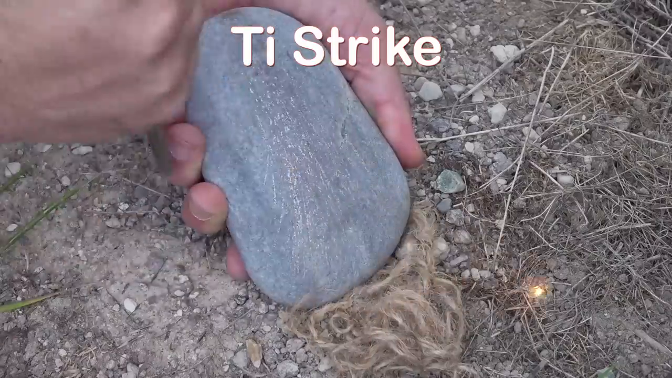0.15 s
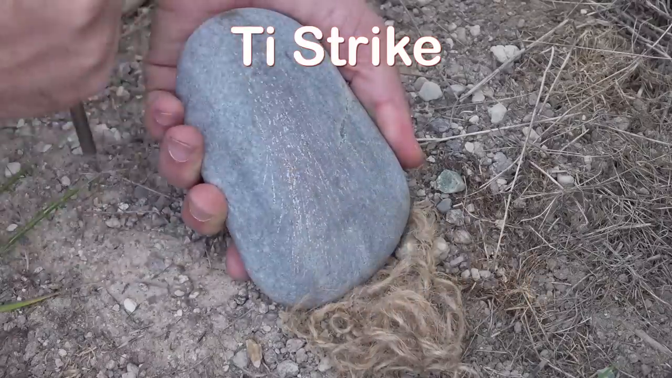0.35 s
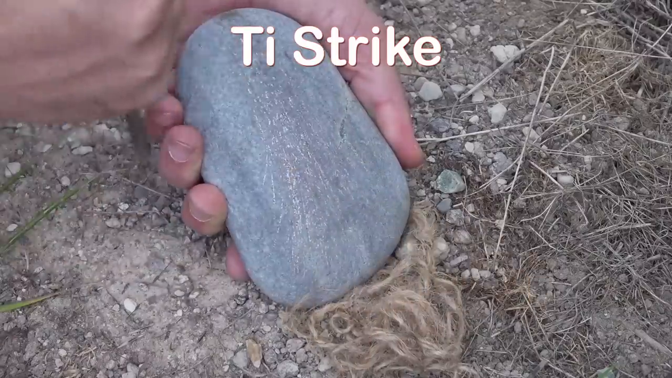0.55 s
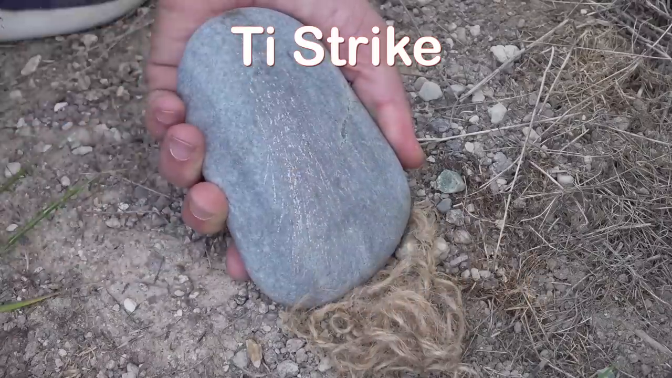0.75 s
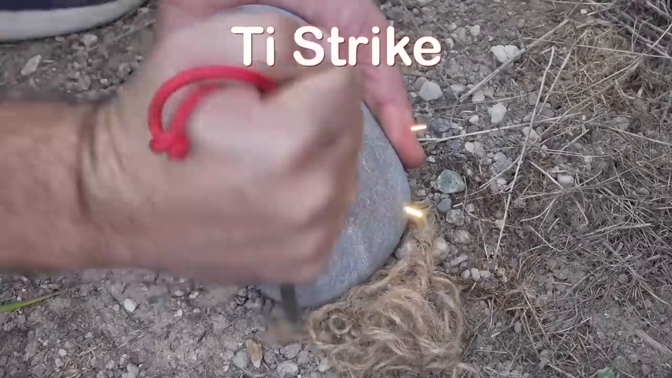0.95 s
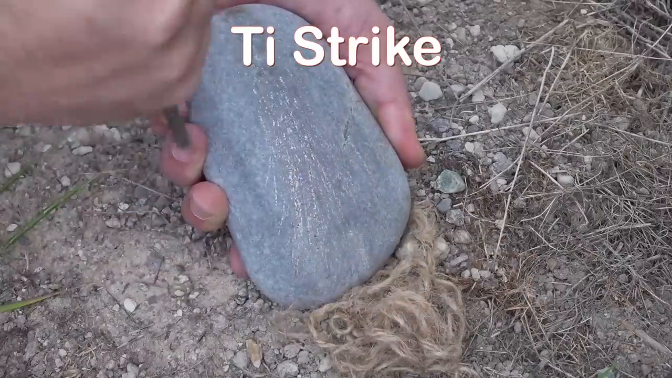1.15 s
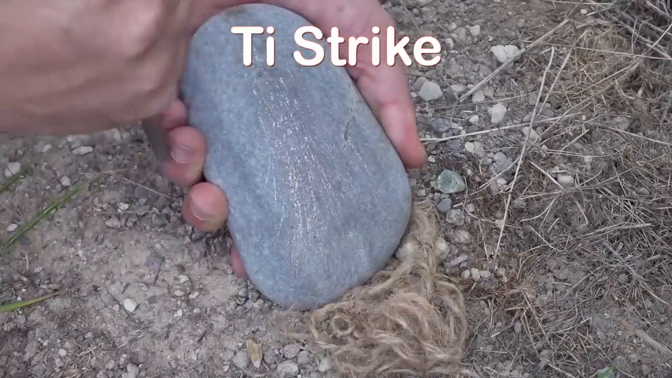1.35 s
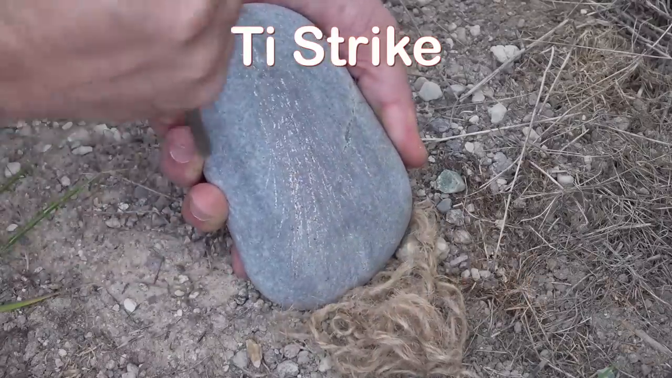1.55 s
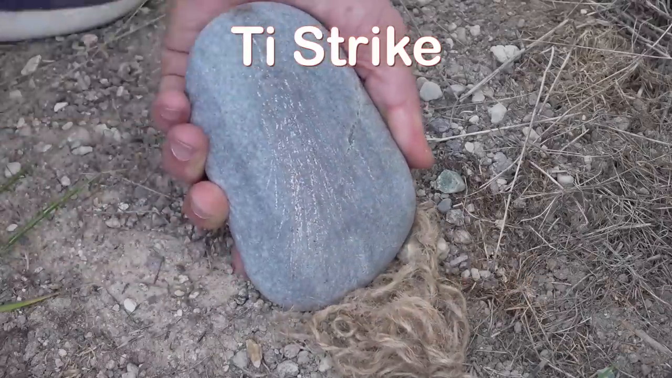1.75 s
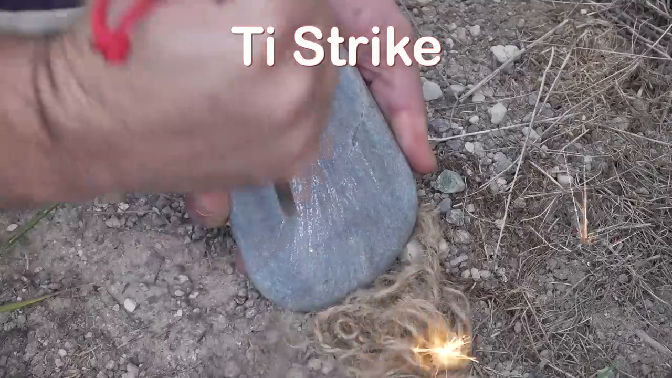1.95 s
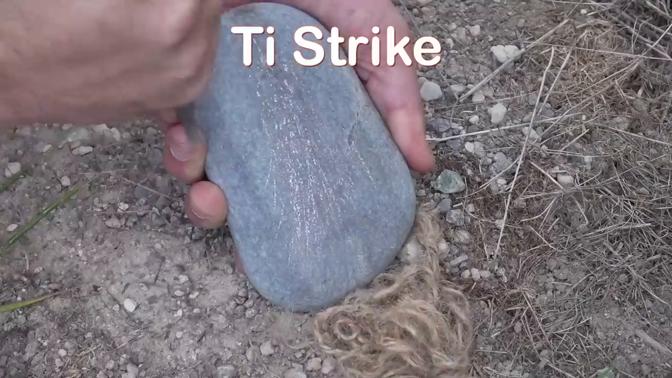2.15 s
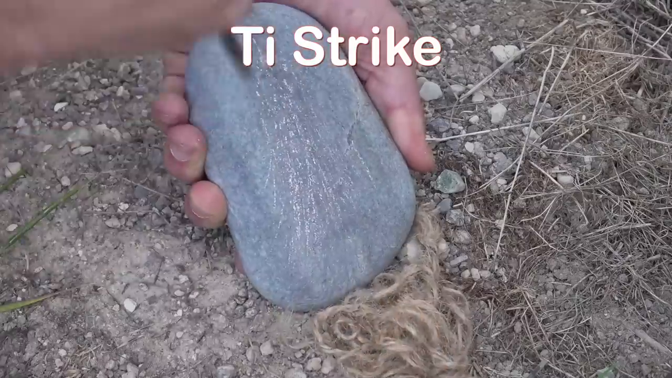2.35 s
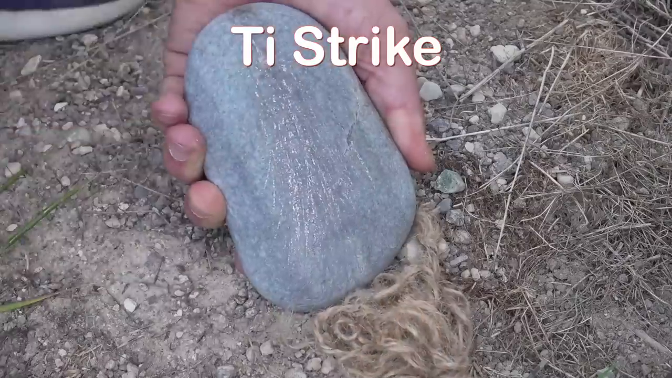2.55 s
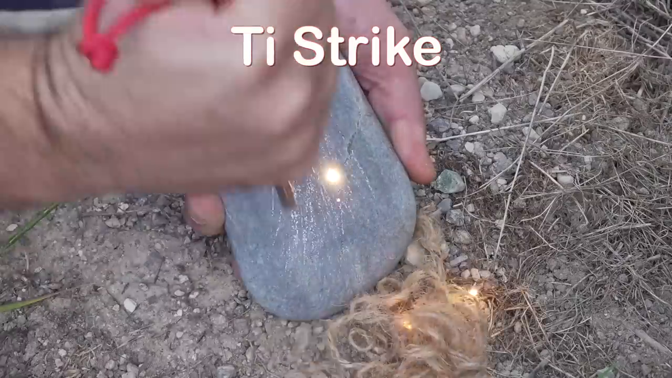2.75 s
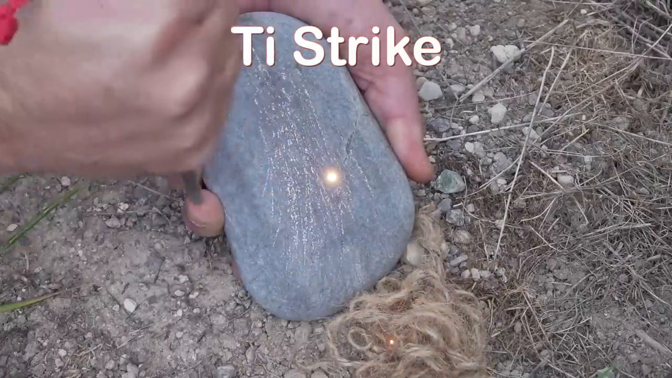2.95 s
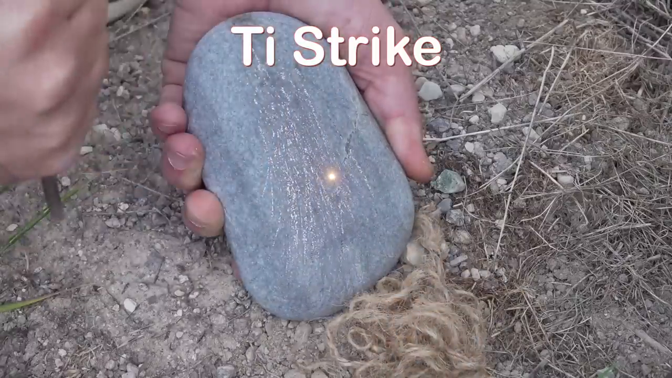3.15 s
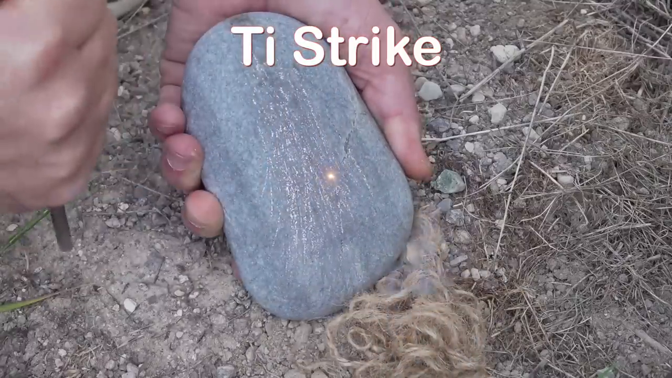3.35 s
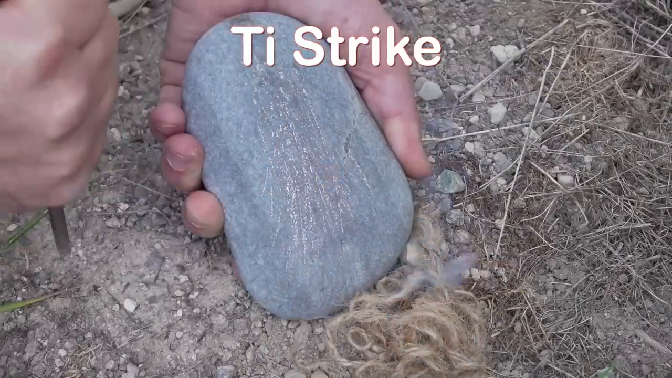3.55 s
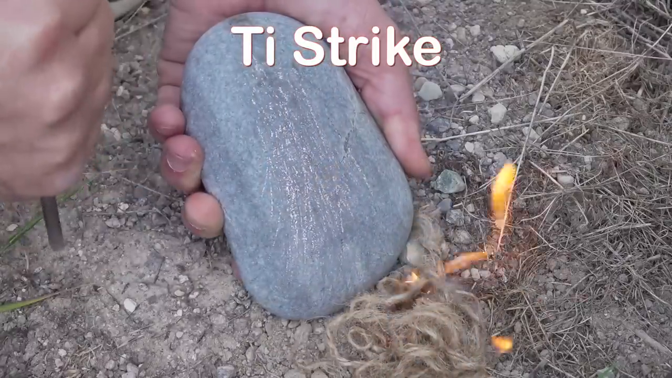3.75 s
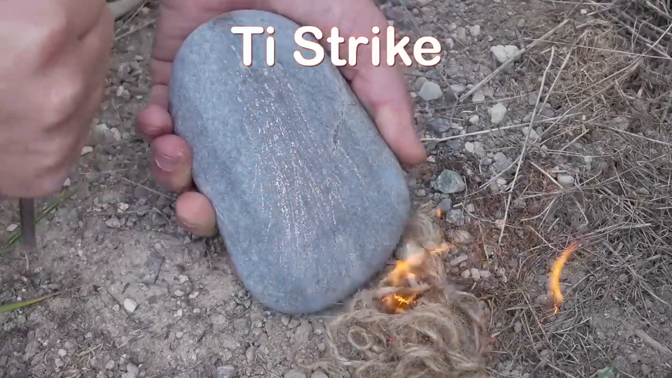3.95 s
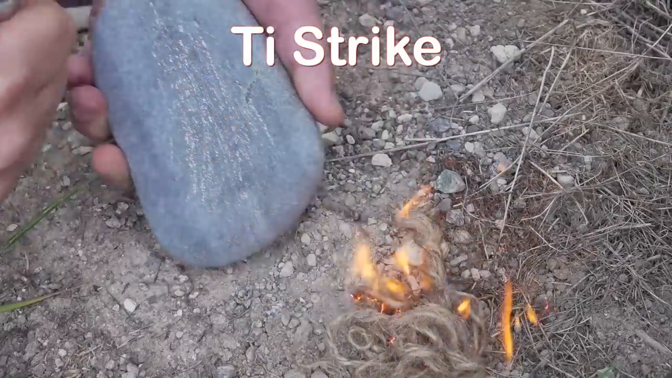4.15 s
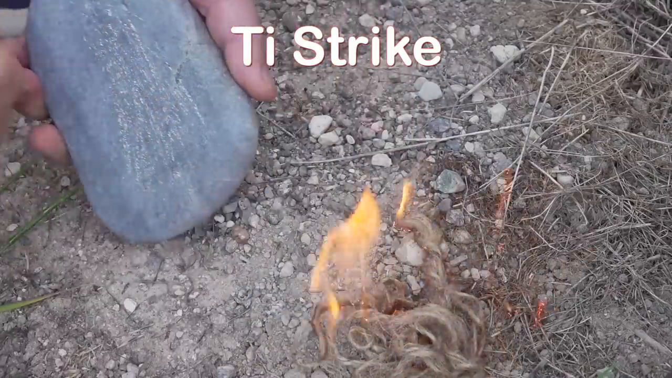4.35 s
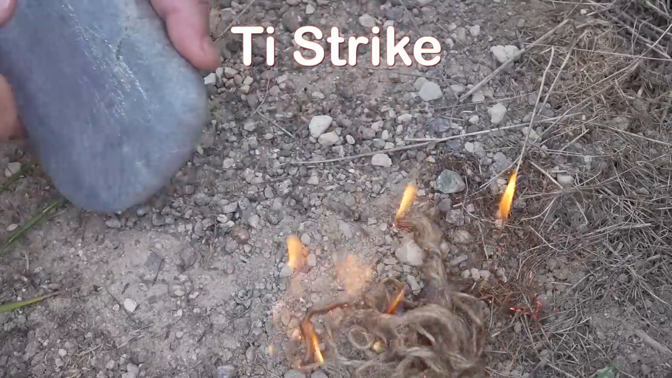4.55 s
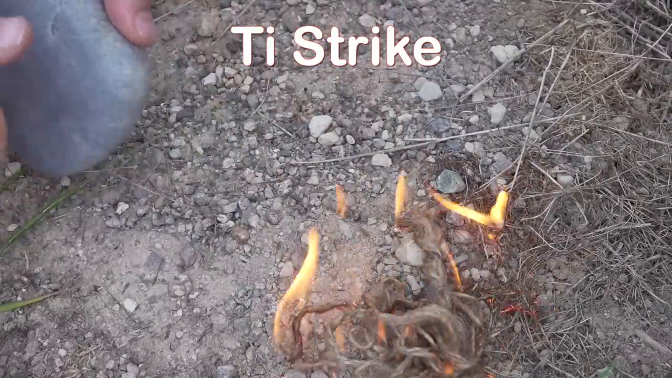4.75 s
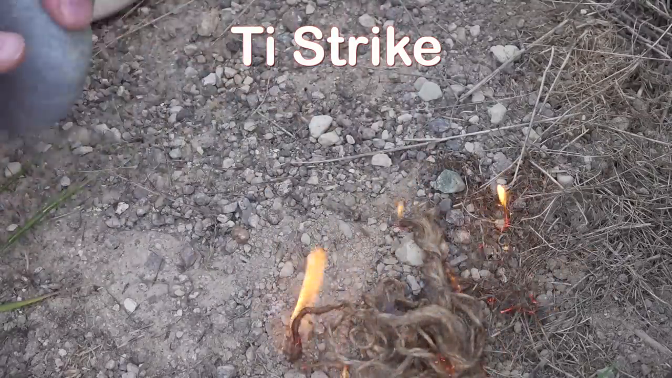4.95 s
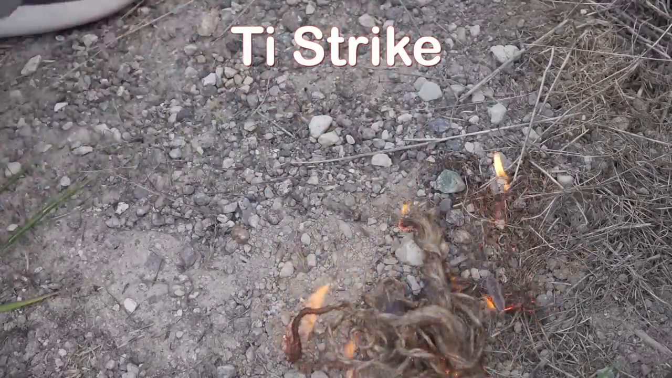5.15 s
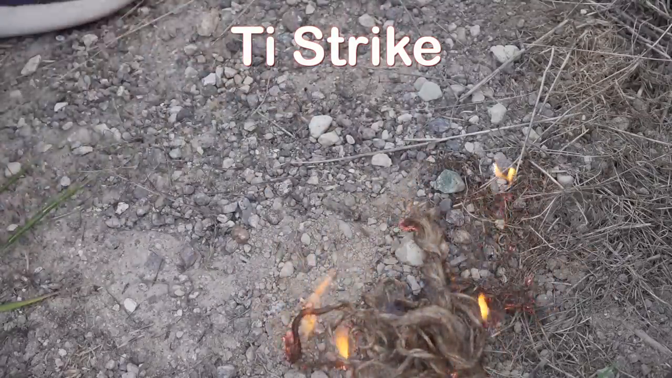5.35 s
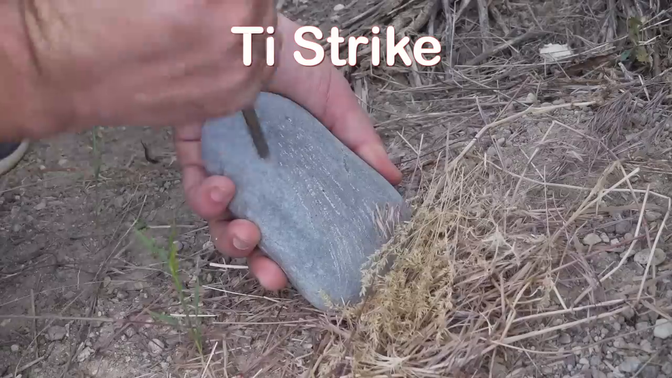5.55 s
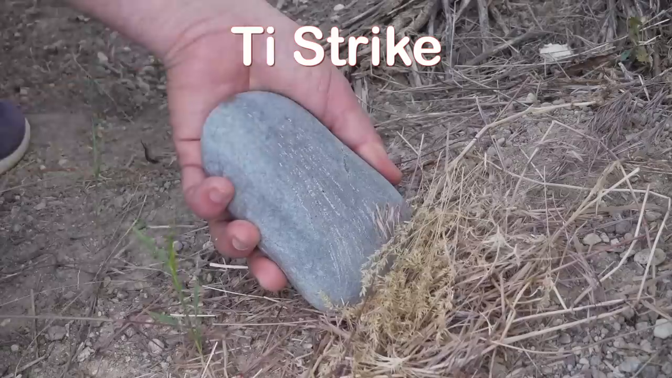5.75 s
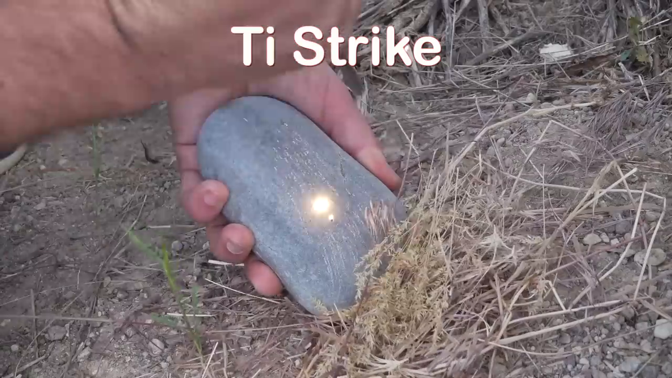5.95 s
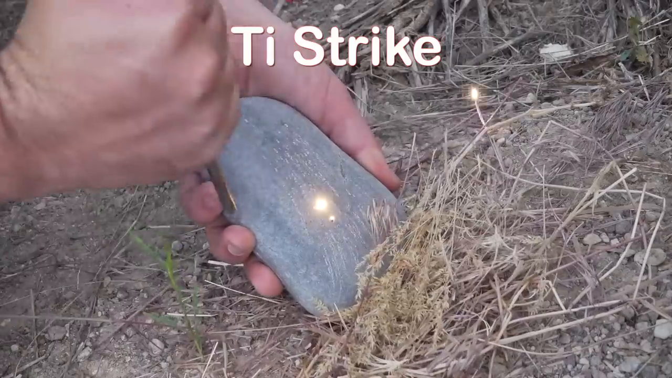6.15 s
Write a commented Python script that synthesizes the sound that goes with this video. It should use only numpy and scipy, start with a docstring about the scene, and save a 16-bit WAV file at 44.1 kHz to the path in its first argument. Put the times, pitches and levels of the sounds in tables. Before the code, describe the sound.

A metal rod strikes and scrapes a stone four times outdoors, with sparks popping and fizzing and tinder faintly catching fire.

```python
"""Four sharp clacks, each with a short gritty scrape: a titanium rod struck down a hand-held stone,
close by, outdoors. The sparks fizz as they burn and pop as they burst. Dry tinder catches, hisses
and dies away. Wind nudges the microphone, birds whistle far off, and near the end a distant engine
comes in with a low drone that fades and slows."""
import sys
import numpy as np
from scipy import signal
from scipy.io import wavfile

SR = 44100
rng = np.random.default_rng(int(sys.argv[2]) if len(sys.argv) > 2 else 0)


def put_to_file(sound):
    """Save the sound as 16-bit audio at rate SR, in the file named by the first command-line argument."""
    columns = np.atleast_2d(sound).T  # one column per channel
    safe = np.clip(columns, -1, 1)
    whole_steps = np.round(safe * 32767)
    wavfile.write(sys.argv[1], SR, whole_steps.astype(np.int16))


N = 273217
TIME = np.arange(N) / SR

# modes of the first blow and of the sliding rod: f/Hz, width/Hz, level/dB
BLOW_MODES = [(1170, 140, -11), (4800, 180, -2.5), (5230, 160, 4), (5860, 220, 0.5), (8120, 190, -9),
              (8484, 220, -4.5), (9300, 260, -9)]
ROD_MODES = [(2870, 140, -18), (5070, 110, 0.5), (5260, 89, -3), (5500, 100, -8.5), (5970, 110, -3.5),
             (6700, 90, -7), (7480, 110, -6.5), (8400, 90, -8), (10910, 90, -10), (12500, 90, -14.5)]
# palm-damped stone: f/Hz, width/Hz, level/dB, peak after contact/s
STONE_MODES = [(1217, 96, -3, 0.0046), (1618, 130, -2.5, .021), (3150, 270, -7.5, .022)]
# spectra of landing chatter and breaking grit: f/Hz, level/dB
CHATTER_SPECTRUM = [(200, -34), (750, -32.5), (1150, -5.5), (1900, -15), (3400, -20.5), (4300, -11.5),
                    (5100, 2), (6100, -6.5), (7000, -11.5), (8300, -4), (10500, -14), (13000, -16),
                    (16000, -40.5)]
GRIT_SPECTRUM = [(150, -22.5), (520, -23.5), (2100, -8.5), (2550, -14.5), (3700, -12.5), (4500, -3.5),
                 (5300, -3), (6200, -0.5), (7000, -6.5), (8500, -8), (11000, -10), (13000, -14.5),
                 (16000, -23.5)]


def strike(clack_db, scrape_db, peak_s, fade_db_per_s, stone_db, squeal_hz, squeal_db, tilt_db):
    """The rod lands, chatters, bites harder as it slides, and lifts off in a spray of sparks."""
    t = np.arange(SR // 6) / SR
    landing = np.minimum(t / .00039, 1) * np.exp(-np.maximum(t - .001, 0) / .0022)
    rung = ring(signal.unit_impulse(len(t), round(.0003 * SR)), BLOW_MODES)
    # small bodies radiate little bass
    radiation = [(200, -31), (600, -14.5), (1100, .5), (2800, -10), (4700, -2.5), (9000, .5),
                 (14000, -5.5)]
    blow = at_level(colour(rung, radiation), landing, clack_db - 3.5)
    bounces = grit(landing, spread_db=-1.5, per_s=23000)
    chatter = at_level(colour(bounces, CHATTER_SPECTRUM), landing, clack_db - 2)

    pressure_db = -420 * np.maximum(peak_s - .005 - t, 0)
    pressure_db -= fade_db_per_s * np.maximum(t - peak_s - .002, 0)
    skip_db = 1.4 * wander(450)[:len(t)]  # rod skips over the grain
    slide = amp(pressure_db + skip_db) * np.minimum(t / .0022, 1)
    fractures = grit(slide, spread_db=4, per_s=5700)
    scrape = at_level(colour(fractures, GRIT_SPECTRUM, tilt_db), slide, scrape_db - 2.5)
    rod = at_level(ring(grit(slide ** .91, spread_db=2), ROD_MODES), slide, scrape_db - 6.5)
    bite = grit(slide ** 2)  # hard pressure only
    squeal = at_level(ring(bite, [(squeal_hz, 120, 0)]), slide, squeal_db)
    stone = np.zeros(len(t))
    for hz, width_hz, db, wake_s in STONE_MODES:  # moving contact wakes the modes in turn
        drive = np.exp(-((t - wake_s) / .011) ** 2)
        stone += at_level(ring(grit(drive, spread_db=1.5), [(hz, width_hz, 0)]), drive, stone_db + db)

    push = np.exp(-((t - .033) / .02) ** 2)  # hand takes up the blow
    hand_spectrum = [(60, -13), (230, -1), (480, -11.5), (800, -3), (2500, -10.5), (8000, -45)]
    thud = at_level(colour(grit(push), hand_spectrum), push, scrape_db - 23)
    flight = np.exp(-np.abs(t - .045) / .011)
    particles = grit(flight, spread_db=4, per_s=1300)
    spray = at_level(colour(particles, GRIT_SPECTRUM, tilt_db=1.1), flight, -47)
    return blow + chatter + scrape + rod + squeal + stone + thud + spray


# rod strokes: t/s, clack ref/dB, scrape ref/dB, pressure peak/s, fade/(dB/s), stone ref/dB,
# squeal/Hz, squeal/dB, grit tilt/(dB/octave)
STROKES = [(0.9462, -8.5, -19.5, 0.021, 1147.5, -32.5, 5330, -25.5, 7.5),
           (1.8853, -5.5, -17, 0.019, 1001, -29.5, 5555, -22.5, 0.5),
           (2.6618, -8, -19, 0.023, 1394, -28, 7520, -28, 1.5),
           (5.8897, -10.5, -28, 0.0214, 1200, -27.5, 5090, -37, -5)]


def strokes():
    """Four blows of rod on stone, amid the handling noise."""
    out = handling()
    for start_s, *stroke in STROKES:
        add(out, start_s, strike(*stroke))
    return out


# light rod contacts: t/s, grit/dB, stone/dB, decay/s
ROD_GRAZES = [(0.9915, -32, -44, 0.0013), (1.218, -35, -32, 0.0018), (2.0974, -42.5, -66, 0.0027),
              (2.244, -56.5, -51, .004), (2.7625, -51, -55.5, 0.029), (2.8247, -45.5, -60, .003),
              (5.609, -46.5, -67, 0.0025)]
# shifting grip: t/s, level/dB, f/Hz, decay/s
GRIP_KNOCKS = [(2.763, -44.5, 740, .04), (3.6572, -37.5, 1010, 0.018), (3.548, -50.5, 370, 0.013),
               (3.731, -50.5, 660, 0.017), (3.983, -47.5, 320, 0.018), (4.2525, -40.5, 378, 0.011),
               (5.132, -44, 1900, 0.0029)]


def handling():
    """The rod grazes the stone; the grip shifts with knocks dulled by flesh."""
    out, t = np.zeros(N), np.arange(SR // 6) / SR
    modes = [mode[:3] for mode in STONE_MODES]
    for start_s, grit_db, stone_db, decay_s in ROD_GRAZES:
        force = np.exp(-t / decay_s)
        scratch = at_level(colour(grit(force), GRIT_SPECTRUM), force, grit_db)
        stone = at_level(ring(grit(force), modes), force, stone_db)
        add(out, start_s, scratch + stone)
    for start_s, db, hz, decay_s in GRIP_KNOCKS:
        force = np.exp(-t / decay_s)
        flesh_spectrum = [(hz / 4, -6), (hz, 0), (2 * hz, -9), (8 * hz, -38)]
        knock = colour(grit(force, spread_db=4, per_s=1500), flesh_spectrum)
        add(out, start_s, at_level(knock, force, db))
    return out


# bursting sparks: t/s, crack ref/dB, puff ref/dB, puff/Hz
SPARK_BURSTS = [(.0078, -20.5, -27, 1070), (0.033, -32.5, -30.5, 845), (0.056, -50, -37.5, 1100),
                (0.0818, -45, -33, 1270), (0.0831, -41, -29, 1260), (1.0334, -17.5, -50, 1100),
                (1.0975, -13, -25, 1030), (2.005, -15, -33.5, 690), (2.013, -21.5, -40, 1210),
                (2.711, -26, -23, 2200), (2.7182, -25.5, -25, 1800), (2.9489, -20, -33, 382),
                (2.964, -36, -37, 900), (4.1482, -30.5, -66, 600), (5.9665, -28, -22, 1600)]


def pops():
    """A spark bursts with a crack and a puff of hot gas; gravel scatters both, unequally per side."""
    out, t = np.zeros((2, N)), np.arange(SR // 25) / SR
    gravel_spectrum = [(200, -9.5), (900, 1), (3000, -7), (14000, -12.5)]
    for start_s, crack_db, puff_db, hz in SPARK_BURSTS:
        phase = 2 * np.pi * hz * t
        puff = (1 - phase) * np.exp(-phase) * (1 - np.exp(-t / .00007))
        crack = np.exp(-t / .00006) * np.cos(2 * np.pi * 7800 * t)
        burst = amp(crack_db + 8) * crack + amp(puff_db + 18) * puff
        echo_age_s = np.maximum(t - rng.uniform(.00049, .001183), 0)
        paths = rng.standard_normal((2, len(t))) * (echo_age_s > 0) * np.exp(-echo_age_s / .0031)
        returns = [np.convolve(burst, path / np.linalg.norm(path))[:len(t)] for path in paths]
        echo, spread = (colour(x, gravel_spectrum) for x in returns)
        side = amp(8.5) * colour(spread, SIDE_SPECTRUM)
        add(out[0], start_s + .0004, burst + echo + side)
        add(out[1], start_s + .0004, burst + echo - side)
    return out


# showers of burning metal: t/s, life/s, birth ref/dB, flare ref/dB
SPARK_SHOWERS = [(0, 0.38, -51.5, -60.5), (.98, .28, -56, -58), (1.92, 0.25, -55.5, -63),
                 (2.74, 0.443, -51, -54), (5.94, 0.27, -55, -54)]
# their fizz: f/Hz, level/dB
FIZZ_SPECTRUM = [(200, -10.5), (600, -6.5), (1200, 0.5), (2000, -5), (3500, -8), (6000, -13.5),
                 (8500, -27.5), (15000, -31)]
THINNING_DB_PER_S, FLARE_LEAD_S = 42.5, .073


def fizz():
    """Glowing metal: most sparks die early, the last flares just before it burns out."""
    envelope = np.zeros(N)
    for start_s, life_s, birth_db, flare_db in SPARK_SHOWERS:
        end_s = start_s + life_s
        sparks = amp(birth_db - THINNING_DB_PER_S * since(start_s))
        flare = amp(flare_db) * swell(end_s - FLARE_LEAD_S, length_s=.22)
        alight = ramp(start_s, length_s=.025) * (1 - ramp(end_s, length_s=.04))
        envelope += np.hypot(sparks, flare) * alight
    return amp(2) * envelope * hiss(FIZZ_SPECTRUM, side_db=-9, flutter_db=1)


# burning tinder: f/Hz, level/dB
FLAME_SPECTRUM = [(100, -8), (200, -0.5), (600, -4), (1150, 1.5), (1500, -3), (1900, -2.5), (2500, -4.5),
                  (5200, -8.5), (9000, -17), (15000, -27)]
FLAME_FULL_S, FLAME_END_S, FLAME_HISS_DB = 4.25, 5.293, -54
GROW_DB_PER_S, SINK_DB_PER_S, DIE_DB_PER_S = 22.5, 2, 54


def tinder():
    """Hiss and fine crackle: the flame catches, grows, sinks slowly and dies away."""
    growth_db = GROW_DB_PER_S * np.minimum(TIME - FLAME_FULL_S, 0)
    decline_db = SINK_DB_PER_S * since(FLAME_FULL_S) + DIE_DB_PER_S * since(FLAME_END_S)
    envelope = amp(FLAME_HISS_DB + growth_db - decline_db)
    crackle = unit(colour(grit(np.ones(N), spread_db=1, per_s=500), FLAME_SPECTRUM))
    return envelope * (hiss(FLAME_SPECTRUM, side_db=-7.5) + amp(-5.5) * crackle)


# engine drone: multiple of firing rate, level/dB
FIRING_ORDERS = [(2, 0.5), (3, 4), (4, -0.5), (5, -21.5), (6, -11)]
# engine roar: f/Hz, level/dB
ROAR_SPECTRUM = [(60, -15.5), (150, 3.5), (280, -3.5), (400, -11), (1200, -12.5), (2600, -26.5),
                 (5000, -31), (12000, -44)]
ENGINE_START_S, EASE_OFF_S = 5.505, 5.75
FIRING_HZ, SLOWING_HZ_PER_S = 42, 9.9
DRONE_DB, DRONE_FADE_DB_PER_S, ROAR_DB = -36, 12, -48


def engine():
    """A far engine eases off and slows: unsteady low firing orders over a dull roar."""
    firing_hz = FIRING_HZ - SLOWING_HZ_PER_S * since(EASE_OFF_S)
    cycles = np.cumsum(firing_hz * (1 + .011 * wander(12))) / SR
    drone = sum(amp(db + 3 * wander(10)) * np.sin(2 * np.pi * (order * cycles + rng.random()))
                for order, db in FIRING_ORDERS)
    load = amp(DRONE_DB - DRONE_FADE_DB_PER_S * since(ENGINE_START_S))
    roar = amp(ROAR_DB) * hiss(ROAR_SPECTRUM, side_db=-9)
    return ramp(ENGINE_START_S, length_s=.012) * (load * unit(drone) + roar)


# far calls: t/s, length/s, top/Hz, level/dB, pitch jitter/fraction
BIRD_CALLS = [(2.236, 0.15, 2000, -60.5, 0.044), (5.682, 0.029, 3700, -51.5, .12),
              (5.793, .054, 3660, -57, .015)]
CALL_END_DROP = .11  # fraction of top pitch


def birds():
    """Thin whistles and a raspy chirp, each arching in pitch and level."""
    out = np.zeros(N)
    for start_s, length_s, top_hz, db, jitter in BIRD_CALLS:
        arch = np.sin(np.pi * ramp(start_s, length_s))
        hz = top_hz * (1 - CALL_END_DROP * (1 - arch)) * (1 + jitter * wander(1100))
        out += amp(db) * arch * np.sin(2 * np.pi * np.cumsum(hz) / SR)
    return out


# gusts: peak t/s, length/s, level/dB
WIND_GUSTS = [(.18, 0.47, -49.5), (1.604, 0.38, -52.5), (2.439, 0.15, -53.5), (2.715, 0.095, -41.5),
              (2.922, 0.1, -38.5), (3.22, 0.2, -45), (3.726, 0.32, -49.5), (4.17, 0.42, -43.5),
              (5.12, .14, -45), (5.36, 0.2, -46)]
# buffeting: f/Hz, level/dB
WIND_SPECTRUM = [(10, -5), (25, 3.5), (50, -4), (80, -4.5), (130, -14), (200, -21.5), (400, -32),
                 (800, -69)]
BREEZE_DB = -57


def wind():
    """Breeze and gusts buffet the microphone, the right port a little more."""
    gust_power = sum((amp(db) * swell(peak_s, length_s)) ** 2 for peak_s, length_s, db in WIND_GUSTS)
    force = np.sqrt(amp(BREEZE_DB) ** 2 + gust_power)
    return force * hiss(WIND_SPECTRUM, side_db=-14, flutter_db=1) * amp([[-1.6], [1.4]])


# open air: f/Hz, level/dB
AIR_SPECTRUM = [(40, -15), (120, -5), (190, -15), (400, -15), (800, -18.5), (1150, -17), (1550, -23.5),
                (2000, -22.5), (2500, -27.5), (3600, -28), (5000, -29.5), (16000, -31)]
AIR_DB = -57.5


def air():
    """Steady, wide hush of the outdoors."""
    return amp(AIR_DB) * hiss(AIR_SPECTRUM, side_db=-3.5)


# stereo width of the microphone pair: f/Hz, side gain/dB
SIDE_SPECTRUM = [(100, -23.5), (1200, -29.5), (2500, -14), (5000, -7), (9000, -3), (14000, -4.5)]


def microphones(direct, scattered, width_db):
    """Treble scattered by hands and ground reaches the two ports differently."""
    side = amp(width_db) * signal.hilbert(colour(scattered, SIDE_SPECTRUM)).imag  # quarter-cycle shift
    return np.array([direct + side, direct - side])


def ground_return(x, t60_s=.4, wet_db=-37):
    """Faint, dull reflections from open ground."""
    t = np.arange(SR // 2) / SR
    spectrum = [(300, -5.5), (2000, -3), (5000, -16), (14000, -18.5)]
    envelope = amp(-60 * t / t60_s) * np.minimum(t / .032, 1)
    tails = [colour(rng.standard_normal(len(t)), spectrum) * envelope for _ in range(2)]
    return amp(wet_db) * np.array([signal.fftconvolve(x, h / np.linalg.norm(h))[:N] for h in tails])


def grit(force, spread_db=2.5, per_s=9000):
    """Tiny fractures: random impulses of uneven size, scaled by force."""
    count = len(force)
    size = amp(spread_db * np.minimum(rng.exponential(1, count), 4)) * rng.choice([-1, 1], count)
    return force * size * (rng.random(count) < per_s / SR)


def ring(x, modes):
    """Drives damped modes; level sets the energy of each."""
    t = np.arange(len(x)) / SR
    body = sum(amp(db) * np.sqrt(width_hz) * np.exp(-np.pi * width_hz * t) * np.sin(2 * np.pi * hz * t)
               for hz, width_hz, db in modes)
    return signal.fftconvolve(x, body)[:len(x)]


def colour(x, spectrum, tilt_db=0, size=4096):
    """Minimum-phase filter; tilt_db is per octave above about 2 kHz."""
    hz = abs(np.fft.fftfreq(size, 1 / SR))
    knot_hz, knot_db = np.transpose(spectrum)
    db = np.interp(np.log(hz + 1), np.log(knot_hz + 1), knot_db)
    log_gain = np.log(amp(db + tilt_db * np.log2(1 + hz / 2000)))
    taps = np.fft.ifft(np.exp(np.conj(signal.hilbert(log_gain)))).real
    return signal.fftconvolve(x, taps[:size // 2])[:len(x)]


def hiss(spectrum, side_db, flutter_db=0):
    """Stereo noise: mid of rms 1 plus side, then a shared flutter."""
    mid, side = (unit(colour(rng.standard_normal(N), spectrum)) for _ in range(2))
    return (mid + amp(side_db) * np.array([side, -side])) * amp(flutter_db * wander(30))


def wander(per_s):
    """Random drift, rms 1."""
    knots = rng.standard_normal(int(N / SR * per_s) + 2)
    return unit(np.interp(TIME * per_s, np.arange(len(knots)), knots))


def swell(peak_s, length_s):
    """Bell curve, height 1."""
    return np.exp(-(2 * (TIME - peak_s) / length_s) ** 2)


def ramp(start_s, length_s):
    """Linear rise, 0 to 1."""
    return np.clip((TIME - start_s) / length_s, 0, 1)


def since(start_s):
    """Seconds elapsed, 0 before the start."""
    return np.maximum(TIME - start_s, 0)


def at_level(x, force, db):
    """Scales x to the rms of force, plus db."""
    return amp(db) * unit(x) * np.sqrt(np.mean(force ** 2))


def amp(db):
    """Decibels to gain."""
    return 10 ** (np.asarray(db) / 20)


def unit(x):
    """Scales to rms 1."""
    return x / np.sqrt(np.mean(x ** 2) + 1e-20)


def add(mix, start_s, sound):
    """Mixes a sound in at start_s."""
    part = mix[max(round(start_s * SR), 0):][:len(sound)]
    part += sound[:len(part)]


def scene():
    """Strokes and sparks close by, the rest around them."""
    near = microphones(direct=strokes(), scattered=strokes(), width_db=-1) + pops()
    return near + ground_return(near.mean(axis=0)) + fizz() + tinder() + engine() + birds() + wind() + air()


def record(dry):
    """Soft overload on the loudest clacks, then a low-pass."""
    ceiling, cutoff_hz = 1.15, 15800
    limited = ceiling * np.tanh(dry / ceiling)
    lowpass = signal.firwin(401, cutoff_hz, window=("kaiser", 8), fs=SR)
    return signal.oaconvolve(limited, lowpass[None], "same")


dry = scene()
out = record(dry)
put_to_file(out)
```